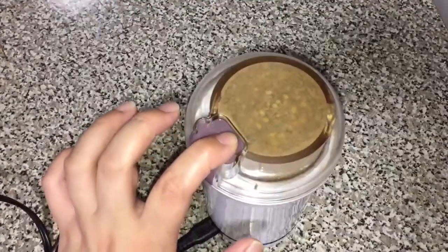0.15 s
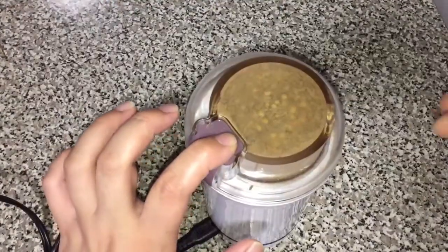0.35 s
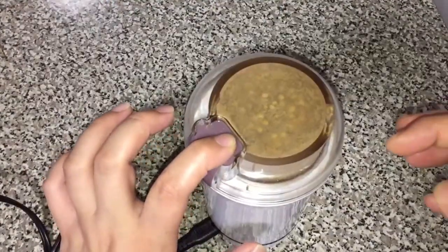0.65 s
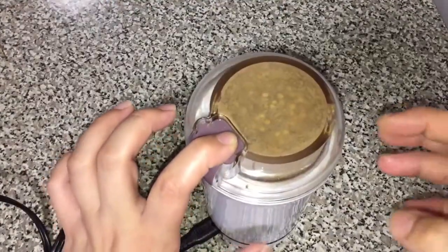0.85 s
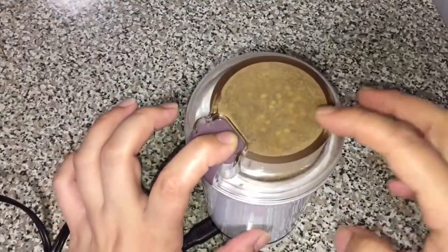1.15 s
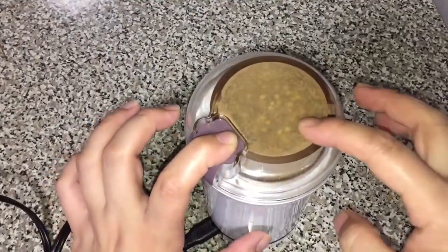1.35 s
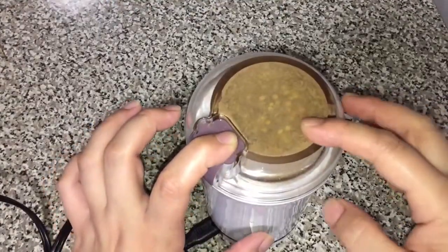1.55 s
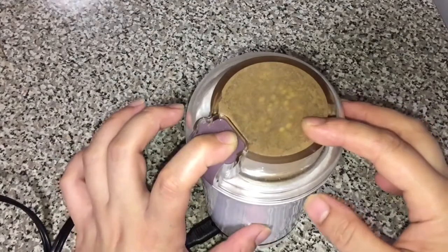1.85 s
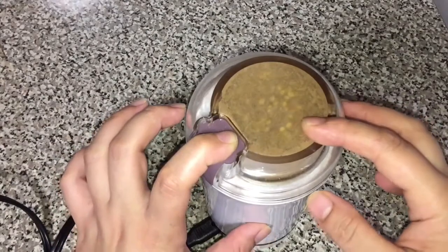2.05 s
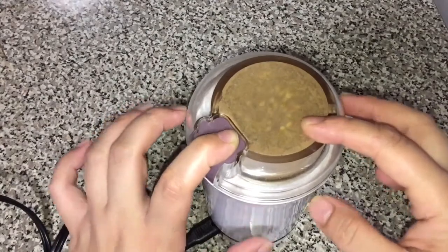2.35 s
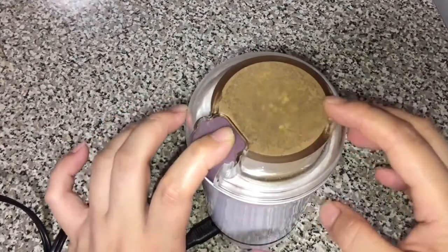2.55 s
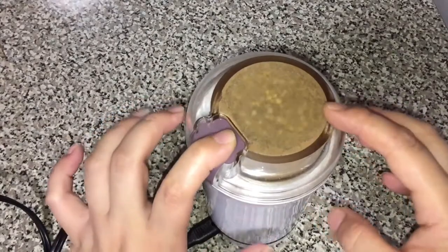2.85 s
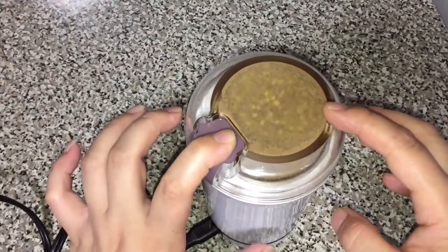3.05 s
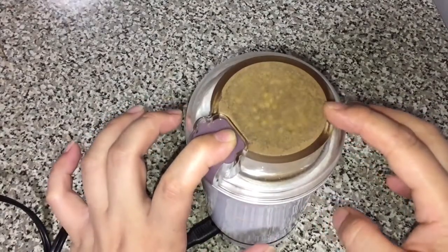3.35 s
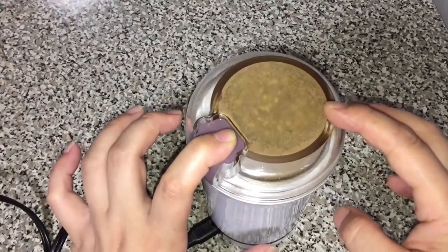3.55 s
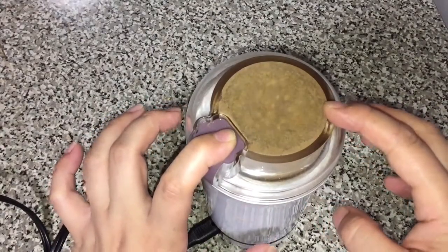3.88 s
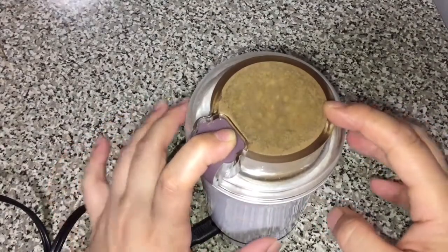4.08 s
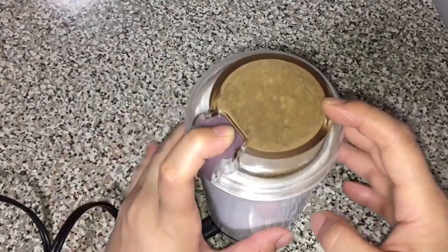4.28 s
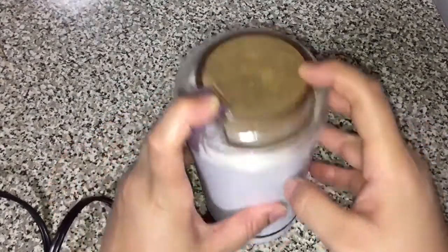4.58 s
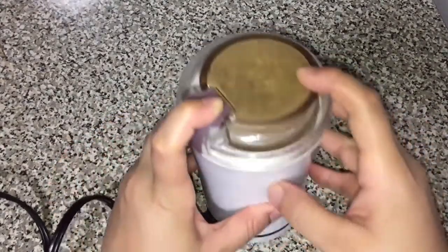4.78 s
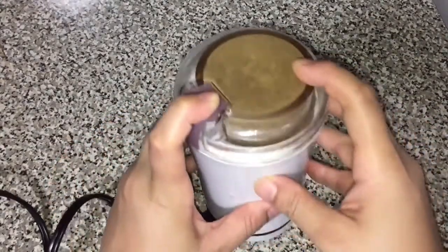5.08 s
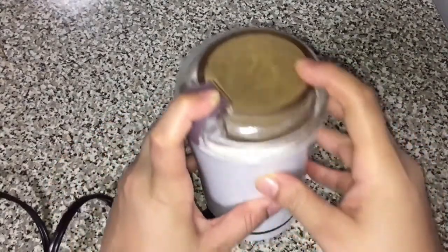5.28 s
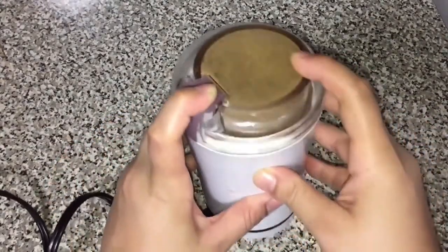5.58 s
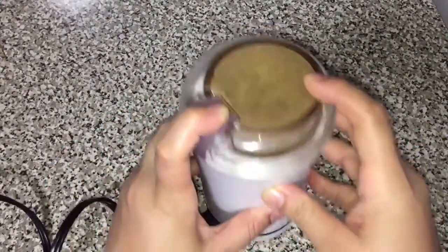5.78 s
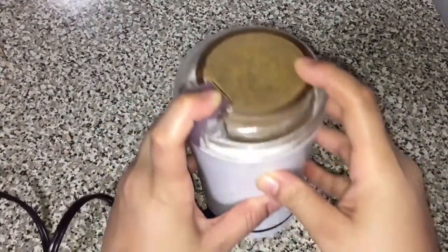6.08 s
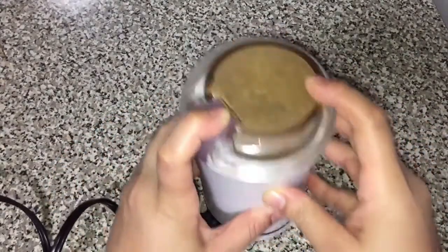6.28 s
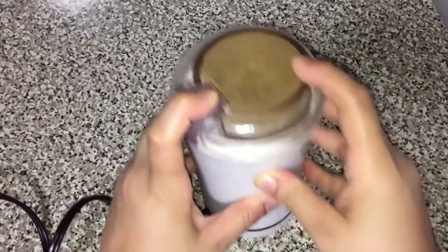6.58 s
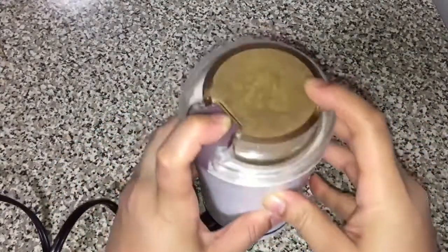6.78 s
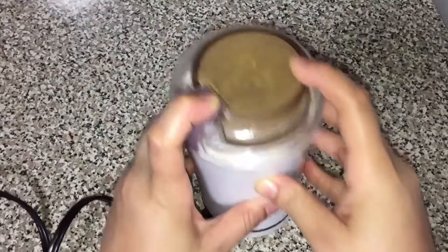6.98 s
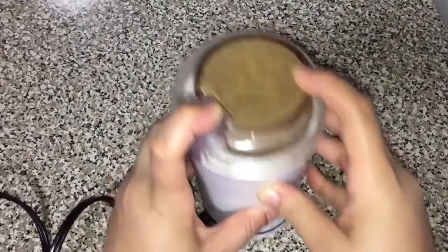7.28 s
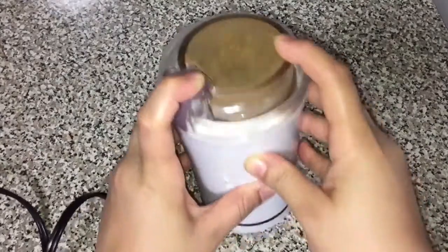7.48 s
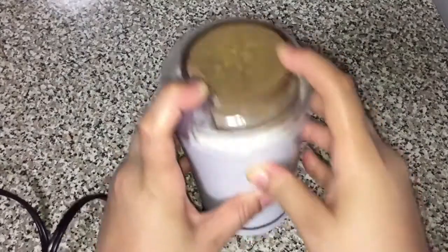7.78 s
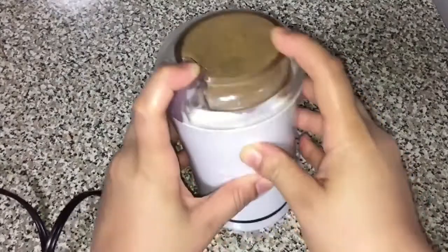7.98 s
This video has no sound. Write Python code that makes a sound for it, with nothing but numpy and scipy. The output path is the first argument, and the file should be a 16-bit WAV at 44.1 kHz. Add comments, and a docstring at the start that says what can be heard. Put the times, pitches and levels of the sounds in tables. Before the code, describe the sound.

A small electric grinder mills whole spices in a kitchen, heard from close up: a whirring motor, a low hum, a fine rattle of seeds and a bright, gritty hiss. About a third of the way in it coasts almost to a stop, then clicks on and spins straight back up. In the second half it is shaken while running, and the whine and hiss throb about four times a second.

```python
"""On a kitchen counter, close by, an electric blade grinder mills whole spices.
Its rotating unbalance and two blade tips make a harmonic whine over the mains hum of the stator.
Switched off, it coasts almost to a stop; it is restarted, then lifted and shaken as it runs.
Impacts excite resonances: seeds rattle the plastic lid while powder scours the steel cup."""
import sys
import numpy as np
from scipy import signal
from scipy.fft import rfft, irfft, next_fast_len
from scipy.io import wavfile
from scipy.ndimage import uniform_filter1d, map_coordinates

SR = 44100
rng = np.random.default_rng(int(sys.argv[2]) if len(sys.argv) > 2 else 0)


def store_wav(level_fs):
    """Save 16-bit WAV to argv[1]."""
    pcm = np.round(np.clip(np.atleast_2d(level_fs), -1, 1) * 32767)
    wavfile.write(sys.argv[1], SR, pcm.T.astype(np.int16))


N = 358533

MAINS_HUM_HZ = 120  # twice the supply frequency
SWITCH_OFF_S, SWITCH_ON_S = 2.525, 2.853
JOLT_AT_S, JOLT_WIDTH_S = SWITCH_ON_S + .02, .013  # the kick of the inrush current
LIFT_AT_S, LIFT_LENGTH_S = 4.3, .31
SETTLE_HZ = 56  # below this shaft speed the load lies almost still


def motor(angle, speed, share, held, stroke):
    """Rotating unbalance radiates once a turn; the blade adds a whine at higher harmonics."""
    # Caking spice shifts the balance. Each row: time in seconds, level in dB.
    unbalance = [(0, -24.5), (.12, -23.5), (.5, -29), (.85, -27.5), (1.05, -23.7), (1.33, -22.5),
                 (1.62, -26.5), (1.85, -25.5), (2.12, -27), (2.43, -22), (3.2, -22), (4.15, -23),
                 (4.38, -19.5), (4.52, -28), (4.9, -25), (8.13, -24.5)]
    # Radiation by the body. Each row: frequency in Hz, gain in dB.
    radiation = [(48, -22), (70, -21), (105, -7), (190, -6), (230, -15.5), (266, 0)]
    # Torque ripple makes sidebands. Each row: side (-1 below, +1 above), relative level in dB.
    sidebands = [(-1, -23), (1, -35.5)]
    # Envelope of the whine. Each row: time in seconds, level in dB.
    blade = [(0, -44.5), (.6, -39), (1.13, -31), (2.33, -32), (2.55, -40), (3.0, -39), (3.33, -28.5),
             (4.25, -35.5), (5.05, -34), (5.75, -43)]
    # Each row: multiple of the shaft speed, relative level in dB, change when held in dB.
    harmonics = [(2, 0.5, -1), (3, -14, -5.5), (4, -11, 0)]
    depth = np.exp(-np.maximum(clock() - 7.4, 0) / .55)  # the last strokes swell less
    swell_db = depth * (3 * stroke + stroke ** 2) + .6 * wobble(14)
    mains = 2 * np.pi * MAINS_HUM_HZ * clock()
    ripple = whine = 0
    for side, db in sidebands:
        ripple += amp(db - 11.5 * held + 3.4 * wobble(18)) * sine(angle + side * mains + .3 * wobble(25))
    stutter_db = 2.5 * (1 - share) * wobble(45)  # uneven as the shaft slows
    shaft_gain = amp(curve(unbalance) + along(radiation, speed) + stutter_db)
    shaft = shaft_gain * (amp(swell_db) * sine(angle) + share ** 2 * ripple)
    blade_db = curve(blade) - 3 + 1.2 * stroke
    for order, db, held_db in harmonics:
        level_db = blade_db + db + held_db * held + (1.3 + 1.1 * held) * wobble(14)
        whine += amp(level_db) * sine(order * angle + .3 * wobble(25))
    return shaft + share ** 2.8 * whine


def powder(angle, speed, cup_toss_db, dust_toss_db, held, stroke, throw):
    """Dense impacts merge into noise: grit excites the modes of the steel cup, and dust fizzes above."""
    # Cup modes, standing and held. Each row: frequency in Hz, width in Hz, relative level in dB.
    standing_modes = [(2950, 340, -17.5), (3110, 73, -15), (3745, 380, -6), (4280, 100, -12.5),
                      (4690, 330, -5), (5330, 350, -10), (5954, 770, -1.5), (6160, 105, -2),
                      (6300, 85, 1.5), (6646, 310, 2.5), (6853, 134, 4.5), (7140, 450, -3.5),
                      (7590, 160, -5)]
    held_modes = [(2810, 120, -10), (3120, 256, -5.5), (3583, 145, -4), (3820, 310, -8.5),
                  (4420, 380, -9.5), (5340, 590, -8.5), (5730, 520, -7), (6155, 330, 2), (6334, 88, 9),
                  (6670, 530, 0.5), (7060, 330, -5.5), (7580, 260, -5)]
    # Powder in flight. Each row: time in seconds, level in dB.
    hiss = [(0, -22), (2.3, -20), (4.2, -21.3), (4.7, -22.5), (8.13, -23.5)]
    # Each row: frequency in Hz, relative spectral density in dB.
    dust_spectrum = [(1500, -40), (2600, -4), (5000, -1.5), (7800, 0), (9200, 2), (9900, 0), (10400, -4.5),
                     (11300, 0), (12300, -.5), (13600, -1.5), (15700, -1)]
    flow = blade_passing(angle, depth_db=.5) * amp(.72 * wobble(110) + .089 * wobble(22))
    grit = flow * impacts(90 * speed, spread_db=.7)
    cup = (1 - held) * amp(-.5) * ringing(grit, standing_modes)
    cup += held * amp(.2) * ringing(grit, held_modes)
    dust = coloured(flow * impacts(130 * speed, spread_db=3), dust_spectrum)
    hiss_db = curve(hiss)
    surge_db = .6 * throw + .35 * wobble(11)  # each stroke throws powder at the wall
    cup_db = hiss_db - .5 + cup_toss_db + surge_db
    dust_db = -27.5 + .31 * (hiss_db - hiss_db.mean()) + dust_toss_db + .51 * surge_db
    return early_reflections(amp(cup_db) * cup + amp(dust_db) * dust, held, stroke)


def seeds(angle, speed, toss_db, held, throw):
    """Impacts excite the lid's modes, in bunches as each tip passes and hardest at the top of a stroke."""
    # Broad modes and the sharpest one. Each row: frequency in Hz, width in Hz, relative level in dB.
    lid_modes = [(946, 190, -16.5), (1070, 160, -25), (1348, 152, -3), (1485, 72, -3.5), (1660, 200, -5),
                 (1892, 180, -0.5), (2065, 300, -11.5), (2394, 260, -10), (2574, 79, -12)]
    sharp_mode = [(1899, 34, 0)]
    hits = impacts(30 * speed, spread_db=1.5) * blade_passing(angle, depth_db=2) * amp(.18 * wobble(60))
    ring = amp(-6.5 + 1.5 * held - 2.5 * throw) * ringing(impacts(9 * speed, spread_db=2.5), sharp_mode)
    finer_db = .22 * np.maximum(clock() - LIFT_AT_S, 0)  # the seeds get finer as they are shaken
    rattle_db = -27 + toss_db - finer_db - .25 * throw + .35 * wobble(11)
    return amp(rattle_db) * (ringing(hits, lid_modes) + ring)


def lid_song(angle, speed, share, stroke):
    """Forced resonance: once-a-turn rubbing makes the lid sing where a harmonic meets one of its modes."""
    # Strength of the rubbing. Each row: time in seconds, level in dB.
    rubbing = [(0, -18.5), (.12, -13), (.3, -18.5), (.42, -16.5), (.68, -21.5), (.95, -28.5), (2.2, -26),
               (3.15, -21), (3.5, -31), (4.6, -27), (5.5, -31)]
    # Each row: multiple of the shaft speed, mode frequency in Hz, width in Hz, gain in dB.
    resonances = [(5, 1338, 110, -9), (7, 1892, 162, -0.5), (9, 2400, 110, -22), (11, 2970, 130, -22)]
    # A caught seed squeals. Each row: centre in seconds, half length in seconds, level in dB.
    squeals = [(1.52, .16, -31.5), (2.19, .09, -25)]

    def rough_harmonic(order):
        return amp(2.6 * wobble(75) - .3) * np.sin(order * angle + .5 * wobble(45))

    song = sum(amp(db) * resonance(order * speed, hz, width) * rough_harmonic(order)
               for order, hz, width, db in resonances)
    squeal = sum(amp(db) * bump(at, width) for at, width, db in squeals) * rough_harmonic(6)
    return share * amp(curve(rubbing) - 2 * stroke) * song + squeal


def stator(held, stroke):
    """Alternating magnetic force makes the iron hum while current flows, louder on the counter."""
    t = clock()
    powered = uniform_filter1d(1. * ((t < SWITCH_OFF_S) | (t > SWITCH_ON_S + .012)), size=700)
    level_db = -31 - 2.1 * held + 3 * stroke + .84 * wobble(7.8)
    return powered * amp(level_db) * np.sin(2 * np.pi * MAINS_HUM_HZ * t)


def housing(speed, share, stir, held):
    """Forced vibration: the loaded body rumbles, and its modes shudder most when slow or kicked."""
    # Each row: frequency in Hz, relative spectral density in dB.
    rumble_spectrum = [(25, -33), (45, -28), (66, 2), (85, -7), (105, 1.5), (165, -4), (230, -8.5),
                       (380, -15), (500, -13.5), (620, -4.5), (760, -19.5), (880, -18.5), (1100, -11.5),
                       (2000, -19.5)]
    # Each row: frequency in Hz, width in Hz, relative level in dB.
    body_modes = [(68.2, 9.1, 2), (172, 120, -2), (336, 87, -7), (602, 85, -1), (924, 71, 2.5),
                  (1053, 120, 2.5)]
    rumble = amp(-35 - 1.2 * held) * np.sqrt(stir) * coloured(rng.standard_normal(N), rumble_spectrum)
    slow = np.clip((.945 - share) / .12, 0, 1) * np.clip((speed - SETTLE_HZ) / 32, .05, 1)
    kick = amp(5.5) * bump(JOLT_AT_S, JOLT_WIDTH_S)
    standing = amp(-14.5) * (1 - held) * stir  # a slight buzz on the counter
    shudder = ringing(impacts(25 * speed, spread_db=1), body_modes)
    return rumble + amp(-32.5) * np.max([slow, kick, standing], axis=0) * shudder


def switch(tick_t60_s=.02, jolt_hz=138):
    """Two transients: the closing contact ticks, then the inrush current jolts the body on its feet."""
    since = since_restart()
    tick = (since > 0) * amp(-28 - 60 * since / tick_t60_s) * rng.standard_normal(N)
    jolt = amp(-22) * bump(JOLT_AT_S, JOLT_WIDTH_S) * np.sin(2 * np.pi * jolt_hz * since)
    return tick + jolt


def early_reflections(x, held, stroke):
    """Comb filtering: short echoes interfere with the direct sound and swish as the grinder moves."""
    # Counter, wall and hands. Each row: delay in ms, its swing with the stroke in ms, gain in dB.
    bounces = [(.95, .02, -16.5), (1.75, -0.032, -19.5), (2.38, 0.069, -15.5), (3.299, -0.039, -16),
               (4.6, .06, -14.5)]
    echoes = np.zeros(N)
    for delay_ms, swing_ms, db in bounces:
        path_ms = delay_ms + swing_ms * stroke + (.021 + .025 * held) * wobble(3)
        echoes += amp(db) * map_coordinates(x, [np.arange(N) - path_ms * SR / 1000], order=3)
    return x + echoes


def kitchen(x):
    """Reverberation: counter and walls return a diffuse tail that decays fastest in the treble."""
    # Each row: frequency in Hz, time to decay by 60 dB in seconds.
    decay_times = [(200, .25), (2000, 0.31), (12000, 0.053)]
    hz, t, noise = signal.stft(rng.standard_normal(SR // 3), SR, nperseg=256)
    _, tail = signal.istft(noise * amp(-60 * t / along(decay_times, hz)[:, None]), SR, nperseg=256)
    return signal.fftconvolve(np.pad(x, (90, 0)), tail / np.linalg.norm(tail))[:N]


def faint_hum(hz=350.6):
    """A weak, nearly pure tone stands behind the grinder."""
    return amp(-56.5) * sine(2 * np.pi * hz * clock() + .4 * wobble(8))


def spin(coast_s=.18, run_up_s=.106):
    """Inertia: the share of full speed decays with the power off and recovers with it on."""
    coast = np.exp(-np.clip(clock() - SWITCH_OFF_S, 0, SWITCH_ON_S - SWITCH_OFF_S) / coast_s)
    return 1 - (1 - coast) * np.exp(-(since_restart() / run_up_s) ** 1.2)


def shaking(stroke_hz=3.75, bottom_at_s=4.812):
    """Harmonic motion: gives the share held in the hands and the stroke, +1 at the bottom, -1 on top."""
    held = np.clip((clock() - LIFT_AT_S) / LIFT_LENGTH_S, 0, 1)
    return held, held * np.cos(2 * np.pi * stroke_hz * (clock() - bottom_at_s))


def stirring(speed, share, pick_up_s=.024):
    """Gain of the load's sound: it settles as the blade slows and is caught up again on the restart."""
    flying = np.clip((speed - SETTLE_HZ) / (speed / share - SETTLE_HZ), .009, 1) ** .73
    return 1 - (1 - flying) * np.exp(-since_restart() / pick_up_s)


def tosses(half_length_s=.05):
    """Clumps flung up by the blade briefly raise the impact noise."""
    # Each row: centre in seconds, then the rise of seeds, powder and dust in dB.
    clumps = [(.02, 2, 1, 1.5), (.15, 2.5, 1, 1), (2.935, 5, 4, 5.5), (3.06, 2.5, 0, 1), (4.68, 1, 0.5, 1),
              (4.86, 3, .5, 1), (5.78, 0.5, -0.5, .3), (6.922, 0.5, 2, .5), (7.35, 2, 0.5, 0),
              (7.5, -1, 2, -0.5), (7.65, 3, -0.5, -1.5), (7.92, 1, 0, -0.5)]
    return sum(np.outer(rises_db, bump(at, half_length_s)) for at, *rises_db in clumps)


def blade_passing(angle, depth_db):
    """Amplitude modulation: a tip ploughs the load twice a turn."""
    return amp(depth_db * np.cos(2 * angle))


def impacts(per_second, spread_db):
    """Shot noise: random hits of scattered size, with even power whatever their rate."""
    chance = np.clip(per_second / SR, 1e-4, 1)
    size = rng.standard_normal(N) * amp(spread_db * rng.standard_normal(N))
    return unit((rng.random(N) < chance) * size / np.sqrt(chance))


def resonance(hz, centre, width):
    """A Lorentzian peak of height 1."""
    return 1 / (1 + (2 * (hz - centre) / width) ** 2)


def ringing(x, modes):
    """x through resonances that add in power, at rms 1."""
    def response(hz):
        return np.sqrt(sum((amp(db) * resonance(hz, centre, width)) ** 2 for centre, width, db in modes))
    return unit(filtered(x, response))


def coloured(x, spectrum):
    """x shaped by a broad spectrum, at rms 1."""
    return unit(filtered(x, lambda hz: amp(along(spectrum, hz))))


def filtered(x, response):
    """x through a frequency response."""
    size = next_fast_len(N + SR // 2)
    return irfft(rfft(x, size) * response(np.fft.rfftfreq(size, 1 / SR)), size)[:N]


def along(points, hz):
    """(Hz, value) points interpolated on a log axis."""
    knots_hz, values = np.transpose(points)
    return np.interp(np.log(hz + 1), np.log(knots_hz + 1), values)


def curve(points):
    """(seconds, value) points interpolated at every sample."""
    return np.interp(clock(), *np.transpose(points))


def wobble(rate):
    """A smooth random curve, rate knots a second."""
    return map_coordinates(rng.standard_normal(N), [np.arange(N) * rate / SR], order=2, mode="wrap")


def bump(at, width):
    """A Gaussian swell of height 1."""
    return np.exp(-((clock() - at) / width) ** 2)


def sine(phase):
    """A sinusoid at rms 1."""
    return np.sqrt(2) * np.sin(phase)


def amp(db):
    return 10 ** (np.asarray(db) / 20)


def unit(x):
    return x / np.sqrt(np.mean(x ** 2) + 1e-20)


def clock():
    return np.arange(N) / SR


def since_restart():
    return np.maximum(clock() - SWITCH_ON_S, 0)


def scene():
    """Superposition: one wavering shaft times the whine and the impacts, and all sources add."""
    # The powered motor under load. Each row: time in seconds, shaft speed in Hz.
    full_speed = [(0, 259.5), (.2, 273), (.45, 281), (.65, 277), (.82, 285), (1.08, 288), (1.55, 283),
                  (2.3, 283.7), (2.52, 278), (3.0, 283), (3.33, 290), (3.7, 282.5), (4.05, 280.5),
                  (4.38, 275), (5.6, 286), (6.1, 286.5), (7.4, 293.5), (8.13, 299)]
    held, stroke = shaking()
    throw = stroke * (1 + .11 * (clock() - LIFT_AT_S))  # each stroke throws the load harder
    share = spin()
    speed = share * curve(full_speed) + 1.26 * stroke
    angle = 2 * np.pi * np.cumsum(speed * (1 + .00204 * wobble(22))) / SR
    stir = stirring(speed, share)
    seed_toss_db, cup_toss_db, dust_toss_db = tosses()
    hiss = powder(angle, speed, cup_toss_db, dust_toss_db, held, stroke, throw)
    load = stir * (hiss + seeds(angle, speed, seed_toss_db, held, throw))
    bright = load + lid_song(angle, speed, share, stroke) + switch()
    body = motor(angle, speed, share, held, stroke) + stator(held, stroke)
    body += housing(speed, share, stir, held)
    mono = bright + amp(-15) * kitchen(bright) + body + faint_hum()
    return np.array([mono, mono])


def record(dry):
    """Band limiting: an ideal low-pass filter removes the highest treble."""
    cutoff_hz = 15740
    return np.array([filtered(channel, lambda hz: hz < cutoff_hz) for channel in dry])


dry = scene()
out = record(dry)
store_wav(out)
```